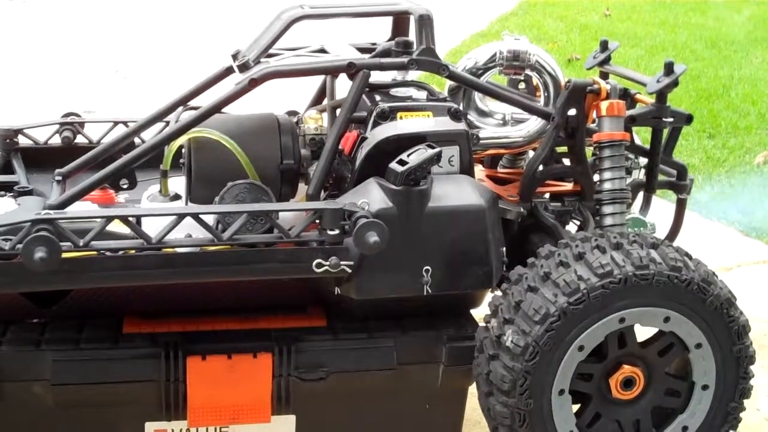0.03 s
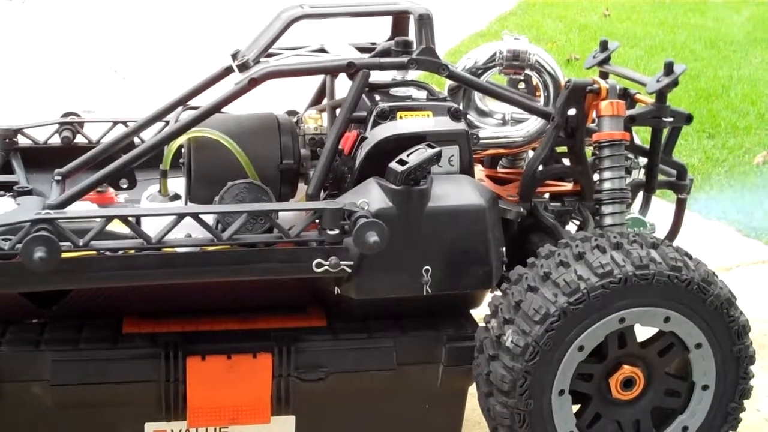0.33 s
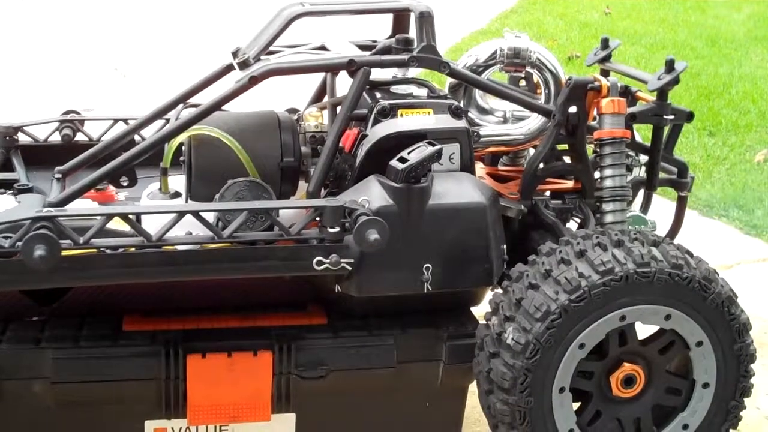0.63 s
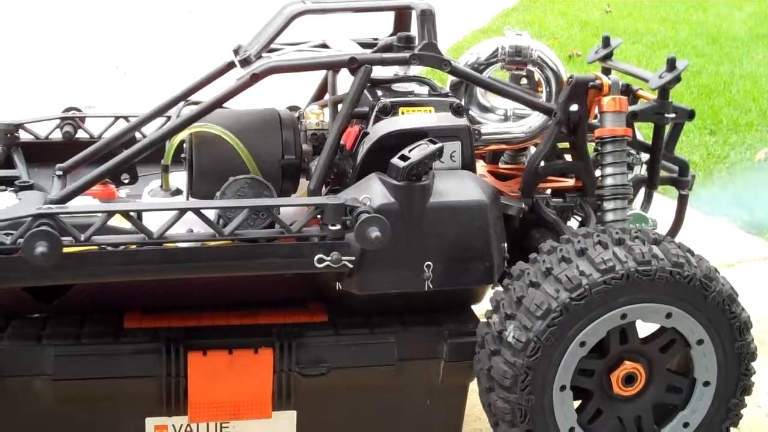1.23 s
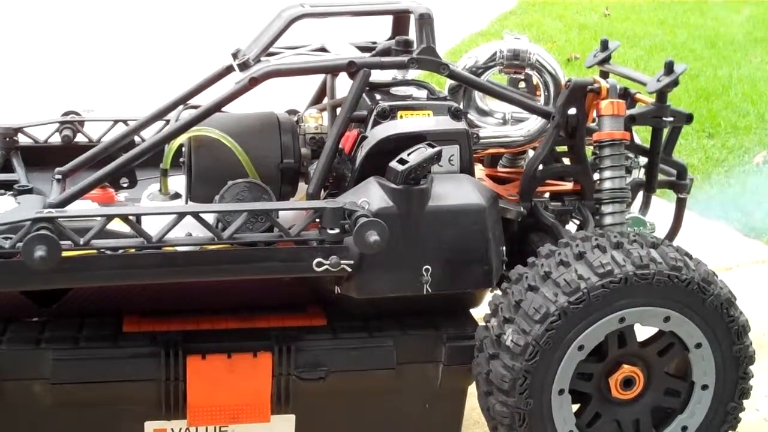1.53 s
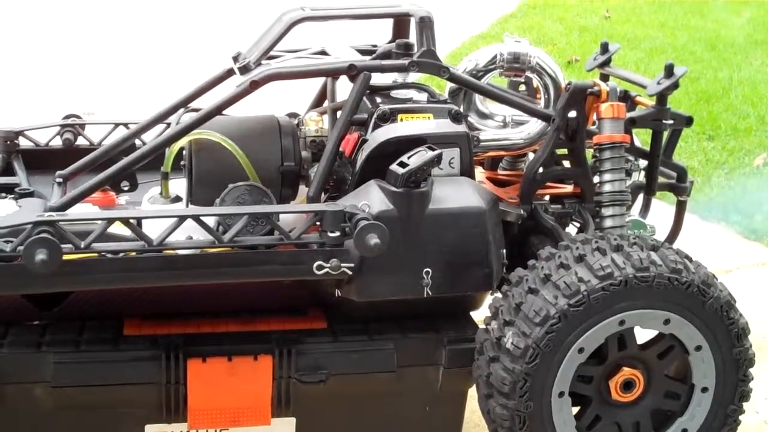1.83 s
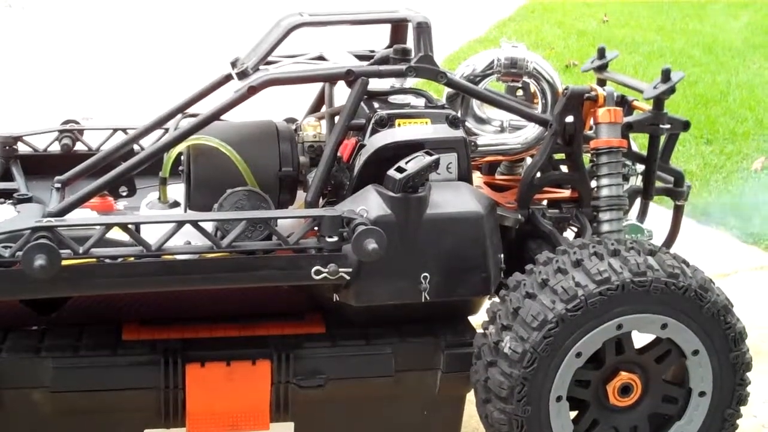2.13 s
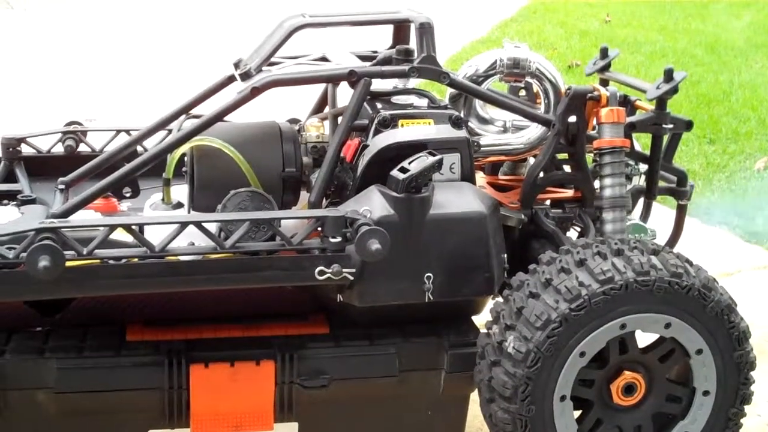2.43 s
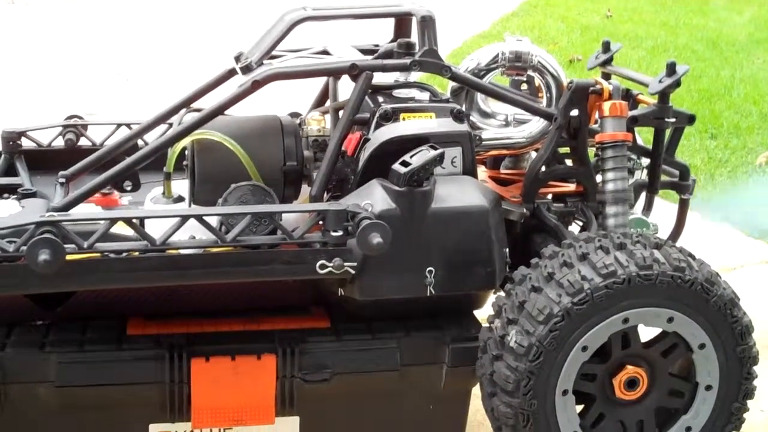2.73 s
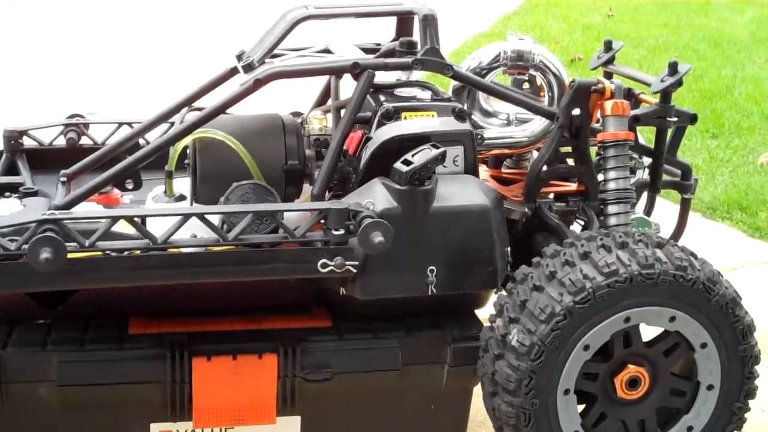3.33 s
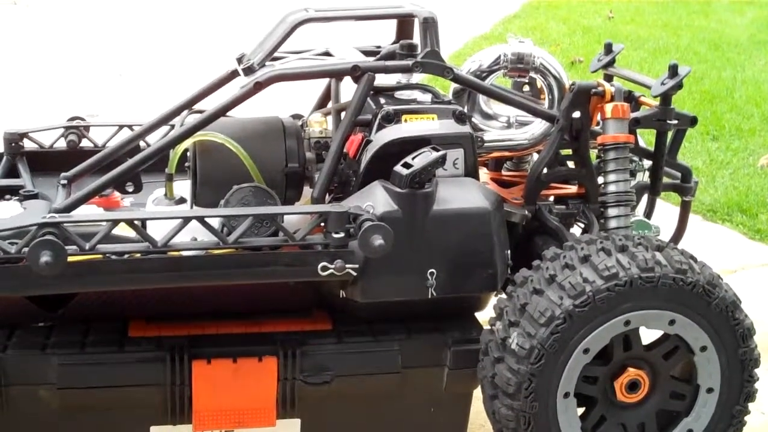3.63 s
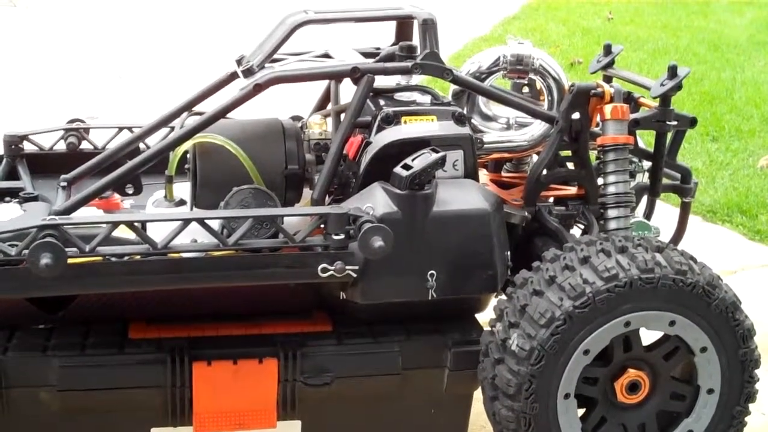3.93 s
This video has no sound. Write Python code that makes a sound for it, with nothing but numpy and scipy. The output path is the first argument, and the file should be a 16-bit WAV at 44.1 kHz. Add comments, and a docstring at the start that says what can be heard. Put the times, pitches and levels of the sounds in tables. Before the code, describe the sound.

Close to the microphone in still outdoor air, a model car's small petrol engine sputters and buzzes. It nearly cuts out, picks up with loud cracks, then starves, bangs twice and rattles to a halt, leaving a faint ring.

```python
"""Outdoors in still air, a model buggy's small two-stroke engine idles close to the microphone.
Every turn pumps two puffs of air, but only every third to fifth turn or so fires, with a crack that
rings the metal exhaust. The engine, a little left of centre, falters, picks up, starves, backfires
twice and knocks to a halt with clinking parts and a faint ring."""
import sys
import numpy as np
from scipy import signal
from scipy.fft import rfft, irfft
from scipy.io import wavfile
from scipy.ndimage import uniform_filter1d

SR = 44100
rng = np.random.default_rng(int(sys.argv[2]) if len(sys.argv) > 2 else 0)


def wav_out(sig):
    """Save sig, one row per channel (or a flat mono array), as 16-bit PCM at SR to the path in sys.argv[1]."""
    wavfile.write(sys.argv[1], SR, np.round(np.clip(np.atleast_2d(sig).T, -1, 1) * 32767).astype(np.int16))


N = 176400
TIME = np.arange(N) / SR


def undb(db):
    """Decibels to gain."""
    return 10 ** (np.asarray(db) / 20)


def unit(x):
    """Scale to rms 1."""
    return x / np.sqrt(np.mean(x ** 2))


def curve(table, column=1):
    """One column of a table, joined by straight lines in time."""
    rows = np.array(table)
    return np.interp(TIME, rows[:, 0], rows[:, column])


def convolve(x, response):
    """Pass a sound through an impulse response."""
    return signal.fftconvolve(np.atleast_2d(x), np.atleast_2d(response), axes=-1)[:, :N]


def band(x, kind, hz, order=4):
    """Highpass or lowpass filter."""
    return signal.sosfilt(signal.butter(order, hz, kind, fs=SR, output="sos"), x)


def colour(x, points, size=2048):
    """Causal filter of unit energy through (Hz, dB) points."""
    hz, db = np.array(points).T
    gain = undb(np.interp(np.log(np.fft.rfftfreq(size, 1 / SR) + 1), np.log(hz), db))
    cepstrum = irfft(np.log(gain))
    cepstrum[1:size // 2] *= 2  # fold to minimum phase
    cepstrum[size // 2 + 1:] = 0
    response = irfft(np.exp(rfft(cepstrum)))
    return convolve(x, response / np.linalg.norm(response))


def clicks(times, sizes):
    """An impulse at each time."""
    return np.bincount(np.clip(np.asarray(times) * SR, 0, N - 1).astype(int), sizes, N)


def fade(x, seconds):
    """Each impulse dies away exponentially."""
    return signal.lfilter([1], [1, -np.exp(-1 / (seconds * SR))], x)


def ring(x, hz, t60):
    """One decaying mode."""
    pole = np.exp((2j * np.pi * hz - np.log(1000) / t60) / SR)
    return signal.lfilter([0, pole.imag], [1, -2 * pole.real, abs(pole) ** 2], x)


def noise(spread=.38):
    """Stereo noise, partly different left and right."""
    mid, side = rng.standard_normal((2, N))
    return np.array([mid + spread * side, mid - spread * side]) / np.sqrt(1 + spread ** 2)


def pan(x, left_db):
    """Lean a sound to the left."""
    return x * undb(np.array([[left_db], [-left_db]]) / 2)


# The cylinder fires. Each row: start in seconds, relative level in dB.
FIRINGS = [(0.0034, -11), (0.0398, -15.5), (0.065, -12.5), (0.11, -12.5), (0.155, -11.5), (0.1994, -14.5),
           (0.235, -13), (0.2776, -12), (0.313, -13.5), (0.357, -12.5), (0.738, 0), (0.815, -1.5),
           (0.8685, -5), (0.9224, -8.5), (0.971, -8), (1.02, -8), (1.066, -8), (1.1125, -7.5), (1.1656, -9),
           (1.2065, -10.5), (1.2396, -10.5), (1.293, -9), (1.3437, -11), (1.3775, -12), (1.4093, -12.5),
           (1.4415, -9), (1.4924, -10.5), (1.5442, -9.5), (1.5836, -9), (1.6348, -11), (1.675, -11),
           (1.7162, -10), (1.7651, -11), (1.8054, -11.5), (1.8466, -10.5), (1.897, -11.5), (1.9286, -11),
           (1.9709, -12), (2.0259, -10.5), (2.0802, -11.5), (2.1382, -12.5), (2.174, -10.5), (2.2308, -11),
           (2.2914, -9), (2.359, -20.5), (2.396, -10), (2.5596, -19.5), (2.599, -6), (2.6905, -7),
           (2.765, -12.5)]
# Exhaust shell modes. Each row: pitch in Hz, t60 in seconds, gain in dB, lean to the left in dB.
SHELL_MODES = [(3400, .05, -7, 3), (4180, .03, -7, 5), (4590, .045, -5, 6), (4830, .04, 0, 6),
               (5400, .045, -5, 3), (5630, .06, -4, 0), (5800, .045, -5, -1), (6170, .045, -5, -2),
               (6360, .045, -2, -3), (6720, .04, -8, -5), (7360, .04, -13, -5), (8650, .04, -16, -5),
               (9750, .04, -16, -4), (10600, .035, -8, -4)]
# Tone of the crack and of the spitting gas. Each row: frequency in Hz, relative level in dB.
CRACK_SPECTRUM = [(100, 34), (250, 17.5), (450, 17.5), (800, -27), (1500, 17), (2600, -5), (4500, 18.5),
                  (6800, -10.5), (8500, -23), (11000, -22), (13000, -10.5), (16000, -35)]
SPIT_SPECTRUM = [(300, 6), (1500, -1), (2800, -7), (4000, -6), (4800, 2), (6700, 2.5), (7800, -11.5),
                 (9600, -14.5), (10600, -6.5), (12000, -28.5), (15000, -43.5)]
SHELL_LAG_S = .00006  # the shell is nearer to the left microphone

def firings():
    """Each firing cracks, spits gas and rings the exhaust shell, which radiates unevenly to the sides."""
    times, db = np.array(FIRINGS).T
    hits = clicks(times, undb(db))
    burst = unit(fade(hits, seconds=.00026) * noise()) * np.sqrt(np.mean(hits ** 2))
    crack = colour(.3 * burst - 1.32 * hits, CRACK_SPECTRUM)
    scatter = undb(3 * rng.standard_normal((len(times), len(SHELL_MODES))))
    shell = np.zeros((2, N))
    for k, (hz, t60, gain_db, left_db) in enumerate(SHELL_MODES):
        strike = burst + .5 * clicks(times, undb(db) * scatter[:, k])
        shell += pan(undb(gain_db) * ring(strike, hz, t60), left_db)
    shell[1] = np.roll(shell[1], int(SHELL_LAG_S * SR))
    spit = colour(fade(hits, seconds=.0097) * noise(), SPIT_SPECTRUM)
    return band(undb(10.5) * crack + undb(-13) * shell + undb(-9) * spit, "highpass", hz=210)


# Silencer modes. Each row: pitch in Hz, t60 in seconds, gain in dB.
SILENCER_MODES = [(279.4, 0.036, -9), (440, 0.023, -14.5), (567, 0.081, -19), (1570, .012, -9),
                  (1810, 0.015, -13)]

def bark():
    """Each firing also thumps the silencer, which is too small to radiate deep bass."""
    times, db = np.array(FIRINGS).T
    hits = band(clicks(times, undb(db)), "highpass", hz=220, order=2)
    return sum(undb(gain_db) * ring(hits, hz, t60) for hz, t60, gain_db in SILENCER_MODES)


# The wandering idle. Each row: time in seconds, base crank speed in turns per second.
CRANK_SPEED = [(0, 112), (.2, 113.5), (.375, 113), (.46, 100), (.6, 82), (.735, 67), (.81, 68), (.98, 82),
               (1.19, 94), (1.42, 93.5), (1.51, 98), (1.75, 100), (1.89, 97), (2.15, 86), (2.33, 85),
               (2.58, 76), (2.8, 78), (2.86, 69.5), (2.93, 59.5), (3.12, 39), (3.2, 32)]
SURGE_TURNS, FLYWHEEL_S = .025, .09

def crank():
    """Crank angle in turns: each firing falls near a whole turn and kicks it ahead, then it sags."""
    fired = np.array(FIRINGS)[:, 0]
    turns = np.cumsum(curve(CRANK_SPEED)) / SR
    gap_fraction = np.interp(TIME, fired, np.arange(len(fired))) % 1
    firing_offsets = np.unwrap(np.interp(fired, TIME, turns) % 1, period=1)
    slip = uniform_filter1d(np.interp(TIME, fired, firing_offsets), int(FLYWHEEL_S * SR))
    return turns - slip + SURGE_TURNS * np.sin(np.pi * gap_fraction)


# Pumping strength. Each row: time in seconds, relative levels of the first and second puff in dB.
PUMPING = [(0.0, -35, -42.5), (0.36, -36, -40.5), (0.43, -36.5, -57), (0.52, -30, -33.5),
           (0.62, -29.0, -24.0), (0.72, -24.5, -27), (0.85, -25.5, -29), (1.0, -28.5, -34),
           (1.3, -28.5, -37.5), (1.7, -28.5, -31.0), (2.0, -29, -35.5), (2.3, -30.5, -38),
           (2.5, -30, -33.5), (2.62, -27.5, -30), (2.76, -31, -34.0), (2.86, -33.5, -33),
           (2.95, -43.5, -37.5), (3.15, -51.5, -37.5)]
# Air box and silencer resonances. Each row: pitch in Hz, width in Hz, relative dB for each puff.
AIRWAYS = [(169, 35, 15.5, -8), (269, 138, -30.5, 14.5), (352.5, 21, -22.5, 22), (436.5, 43, -20, 18),
           (623, 62.0, 20.5, -8.5), (675.5, 54.0, 18, -18), (784, 37.0, 1, -11.5), (883, 62, 14.5, -30),
           (1016.5, 12, 13, 4), (1086, 40, 14.5, -8.5), (1114, 14, -18, -7.5), (1397, 16, -17, -20.5),
           (1910, 130, -9, -7)]
PUFF_JITTER_S, PUFF_SCATTER_DB, FLUTTER_TURNS = .00002, .6, .4

def puffs(turns, which, at_turn):
    """One uneven, turbulent puff a turn rings the airways until the slow strokes begin."""
    times = np.interp(np.arange(1, int(turns[-1])) + at_turn, turns, TIME)
    jitter, scatter = rng.standard_normal((len(times), 2)).T
    pulses = clicks(times + PUFF_JITTER_S * jitter, undb(PUFF_SCATTER_DB * scatter))
    flutter = unit(np.exp(-((turns - at_turn) % 1) / FLUTTER_TURNS)) * rng.standard_normal(N)
    push = pulses * np.sqrt(SR / curve(CRANK_SPEED)) + undb(-25) * flutter
    strength = undb(curve(PUMPING, column=1 + which)) * (TIME < STROKES[0][0])
    t = TIME[:SR // 10]
    airways = sum(undb(db[which]) * width * np.exp(-np.pi * width * t) * np.cos(2 * np.pi * hz * t)
                  for hz, width, *db in AIRWAYS)
    airways = band(band(airways, "highpass", hz=83.3), "lowpass", hz=1900)
    return convolve(push * strength, -airways / np.linalg.norm(airways))


# Two bangs as the engine dies. Each row: start in seconds, relative level in dB.
BACKFIRES = [(3.2548, -7), (3.407, 0)]
# Their tone. Each row: frequency in Hz, relative level in dB.
BANG_SPECTRUM = [(60, -33), (150, -16.5), (280, 10.5), (600, -1), (1300, -1), (1900, -9.5), (2300, -2),
                 (3500, -14), (5800, -5), (8000, -24.5), (11000, -24.5), (15000, -58)]

def backfires():
    """Unburnt fuel goes off in the silencer: a deep bang with a short tail."""
    times, db = np.array(BACKFIRES).T
    hits = clicks(times, undb(db))
    envelope = undb(-6) * fade(hits, seconds=.0044) + undb(-19.5) * fade(hits, seconds=.029)
    return colour(envelope * noise(spread=.3), BANG_SPECTRUM)


# The last slow strokes. Each row: start in seconds, relative levels of thud and clatter in dB.
STROKES = [(3.161, -26, -22), (3.19, -20, -18), (3.222, -20.5, -18), (3.257, -21.5, -20), (3.286, -16, -17),
           (3.318, -19, -16), (3.362, -21, -19), (3.408, -14, -12), (3.433, -18.5, -19),
           (3.465, -17.5, -17), (3.5, -21.5, -15.5), (3.547, -22.5, -19.5), (3.603, -29, -19.5),
           (3.673, -33.5, -22), (3.768, -46, -21.5)]
# Tone of the thud and of the clatter. Each row: frequency in Hz, relative level in dB.
THUD_SPECTRUM = [(50, -35), (100, -2.5), (160, 4), (250, 7), (330, -0.5), (420, -2), (500, -10), (610, 1),
                 (720, -15), (1100, -10), (1600, -37), (3000, -73.5), (12000, -85.5)]
CLATTER_SPECTRUM = [(300, -8.5), (1100, -1), (1450, -26.5), (1750, 0.5), (1950, 1), (2200, 9), (2800, -1.5),
                    (3900, -1.5), (4900, 6), (6300, -8.5), (7200, 2.5), (8800, -9), (10000, -16),
                    (12000, -34), (15000, -61.5)]
# Modes of metal parts and of the hollow silencer. Each row: pitch in Hz, t60 in seconds, gain in dB.
METAL_MODES = [(2830, .25, -12), (3628, .2, -3.5), (4900, .25, -2), (7050, 0.18, 2), (7870, 0.11, 8),
               (8900, 0.09, 5)]
HOLLOW_MODES = [(410, 0.024, -24), (591, 0.057, -25), (810, 0.033, -13), (1180, .015, -20)]
REBOUND_TURN, REBOUND_DB, POP_DELAY_S = .44, -11.5, .002

def strokes():
    """The last compressions and their rebounds shake the chassis, rattle metal and pop the silencer."""
    times, thud_db, clatter_db = np.array(STROKES).T
    rebounds = times[:-1] + REBOUND_TURN * np.diff(times)
    shake = clicks(times, undb(thud_db)) + clicks(rebounds, undb(thud_db[:-1] + REBOUND_DB))
    rattle = clicks(times, undb(clatter_db)) + clicks(rebounds, undb(clatter_db[:-1] + REBOUND_DB))
    shudder = fade(shake, seconds=.015) * noise(spread=.077)
    thud = colour(undb(21.5) * shake + undb(-6) * shudder, THUD_SPECTRUM)
    clatter = colour(fade(rattle, seconds=.0097) * noise(), CLATTER_SPECTRUM)
    metal = sum(undb(db) * ring(rattle, hz, t60) for hz, t60, db in METAL_MODES)
    pops = clicks(times + POP_DELAY_S, undb(thud_db)) + clicks(rebounds, undb(thud_db[:-1] - 6.5))
    hollow = sum((-1) ** k * undb(db) * ring(pops, hz, t60)
                 for k, (hz, t60, db) in enumerate(HOLLOW_MODES))
    return thud + hollow + undb(-18) * clatter + undb(-36) * metal


# Level of the rush. Each row: time in seconds, relative level in dB.
RUSH_LEVEL = [(0, -28), (.36, -29.5), (.43, -33), (.6, -26.5), (.75, -28), (1.0, -28.5), (2.3, -30.5),
              (2.75, -30.5), (2.9, -38), (3.12, -40), (3.22, -38.5), (3.45, -41.5), (3.56, -40.5),
              (3.7, -52), (3.78, -57), (3.83, -77.5)]
# Its tone. Each row: frequency in Hz, relative level in dB.
RUSH_SPECTRUM = [(30, -3), (100, -50.5), (400, 13), (1500, 7.5), (2200, -1.5), (3000, -2), (4000, -4.5),
                 (4900, -1.5), (6500, -7.5), (8500, -9.5), (10800, -25), (12000, -33.5), (16000, -42)]

def rush(turns):
    """Gas and moving parts hiss, swelling once a turn."""
    swell = 1 + .17 * np.cos(2 * np.pi * (turns - .15))
    return colour(noise() * swell, RUSH_SPECTRUM) * undb(curve(RUSH_LEVEL) - 1)


# Level of the nasal buzz. Each row: time in seconds, relative level in dB.
BUZZ_LEVEL = [(0, -36), (.36, -36), (.43, -42), (.62, -39), (1.7, -36.5), (2.3, -39), (2.76, -40),
              (2.9, -52), (3.25, -120)]
# How the pipe shapes it. Each row: frequency in Hz, gain of a harmonic there in dB.
PIPE_RESPONSE = [(70, -30), (180, -20), (220, 2), (235, 2), (270, -20), (720, -20), (785, 1), (830, -9),
                 (900, -3), (970, -8), (1020, -3), (1170, 0), (1330, -14), (1440, -9), (1900, -26)]
BUZZ_SPREAD_TURNS, HARMONICS = .6, 20

def port_buzz(turns):
    """The piston chops the gas flow into harmonics; the pipe spreads each pulse over part of a turn."""
    speed = curve(CRANK_SPEED)
    hz, db = np.array(PIPE_RESPONSE).T
    tone = np.zeros(N)
    for k in range(1, HARMONICS + 1):
        lag = BUZZ_SPREAD_TURNS * k / HARMONICS
        tone += undb(np.interp(k * speed, hz, db)) * np.cos(2 * np.pi * k * (turns - lag))
    return np.sqrt(2) * undb(curve(BUZZ_LEVEL)) * tone


# Loose parts touching. Each row: start in seconds, relative level in dB.
CLINKS = [(3.193, -2.5), (3.212, -6), (3.245, -1), (3.276, 1), (3.293, -5), (3.307, -1), (3.317, 0),
          (3.346, -6), (3.458, 6.5), (3.488, -3), (3.5, -4), (3.546, -3), (3.566, -12), (3.586, -6),
          (3.62, -9), (3.654, -6), (3.703, -9), (3.749, -7)]
# Their modes. Each row: pitch in Hz, t60 in seconds, gain in dB.
CLINK_MODES = [(1780, 0.013, -33.5), (2250, 0.039, -34.5), (2340, 0.017, -34.5), (3220, .03, -38),
               (5300, .025, -51), (8400, 0.034, -45)]
CONTACT_S = .0012

def clinks():
    """Loose parts touch briefly as the engine shakes, a little differently each time."""
    times, db = np.array(CLINKS).T
    scatter_db = 4 * rng.standard_normal((len(times), len(CLINK_MODES)))
    contact = noise() * np.sqrt(2 / (CONTACT_S * SR))
    parts = np.zeros((2, N))
    for k, (hz, t60, gain_db) in enumerate(CLINK_MODES):
        taps = clicks(times, undb(db + gain_db + scatter_db[:, k]))
        parts += ring(contact * fade(taps, CONTACT_S), hz, t60)
    return parts


# Coming to rest. Each row: start in seconds, pitch in Hz, t60 in seconds, level in dB.
SETTLING = [(3.675, 160, .15, -40), (3.775, 120, .13, -37), (3.77, 2961, .85, -58)]

def settle():
    """As the crank stops, the chassis rocks and a metal part rings on."""
    return sum(ring(clicks([start], [undb(db)]), hz, t60) for start, hz, t60, db in SETTLING)


def reflections(engine, t60=.14):
    """Bodywork and ground throw a brief echo back to the microphone."""
    t = TIME[:SR // 2]
    echo = rng.standard_normal((2, len(t))) * np.exp(-np.log(1000) * t / t60)
    return convolve(engine, echo / np.linalg.norm(echo[0]))


# The open air behind the buggy. Each row: frequency in Hz, relative level in dB.
AIR_SPECTRUM = [(30, 8), (200, -0.5), (600, -12), (2000, -16.5), (6000, -24.5), (10000, -34.5),
                (15000, -62)]

def outdoor_air():
    """Still air: a low, steady hush around the microphone."""
    return colour(noise(spread=.4), AIR_SPECTRUM)


def scene():
    """The engine close by and a little to the left, its reflections, and faint air behind."""
    turns = crank()
    pumping = puffs(turns, which=0, at_turn=-.167) + puffs(turns, which=1, at_turn=.501)
    running = undb(2.5) * pumping + port_buzz(turns) + bark()
    stalling = backfires() + strokes() + clinks() + settle()
    engine = pan(running + stalling, left_db=3.3) + pan(firings() + rush(turns), left_db=1.5)
    return engine + undb(-19) * reflections(engine) + undb(-61.5) * outdoor_air()


def record(dry):
    """The recorder clips the highest peaks and cuts the top above 16 kHz."""
    top_cut = signal.ellip(8, .2, 80, 16000, fs=SR, output="sos")
    return signal.sosfilt(top_cut, np.clip(dry, -1, 1))


dry = scene()
out = record(dry)
wav_out(out)
```